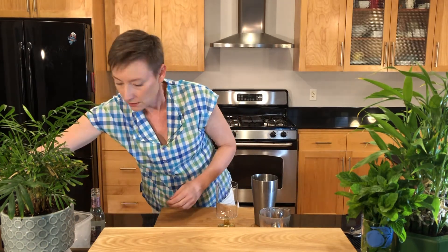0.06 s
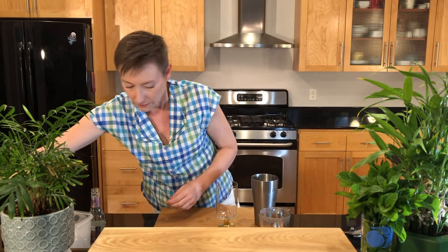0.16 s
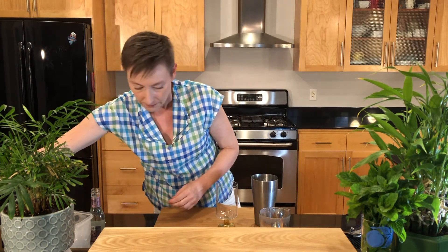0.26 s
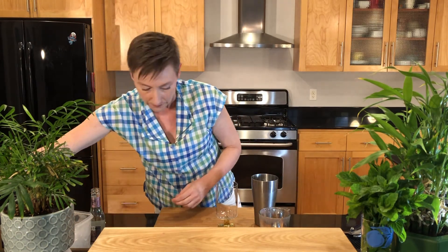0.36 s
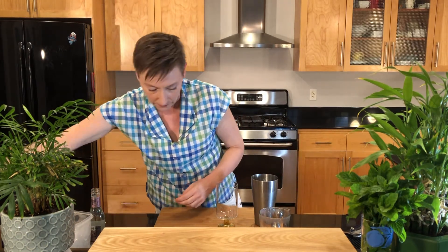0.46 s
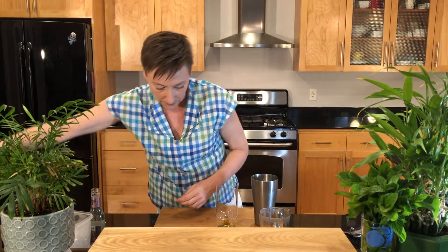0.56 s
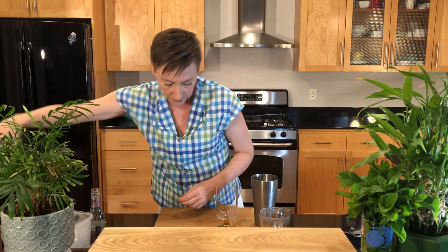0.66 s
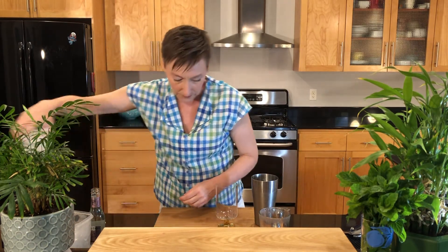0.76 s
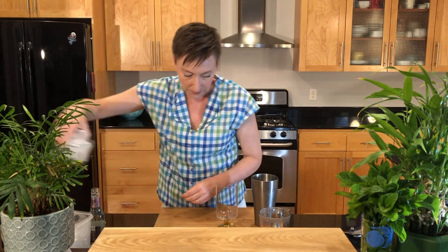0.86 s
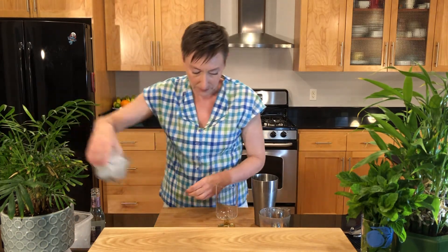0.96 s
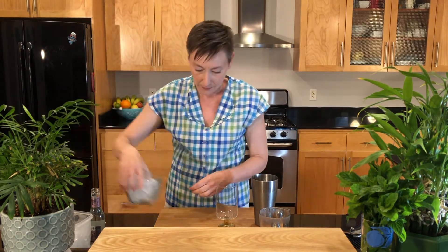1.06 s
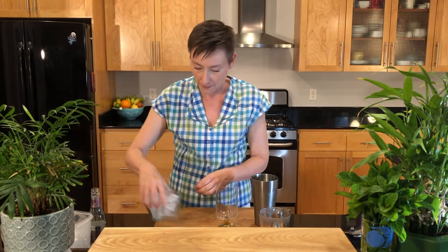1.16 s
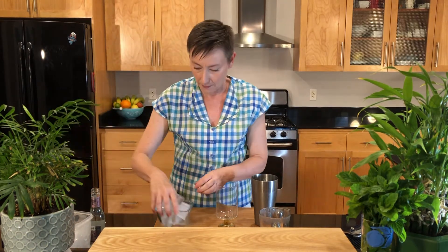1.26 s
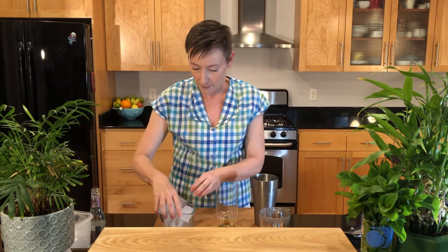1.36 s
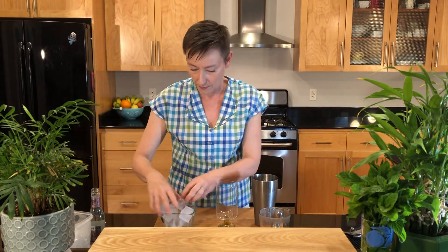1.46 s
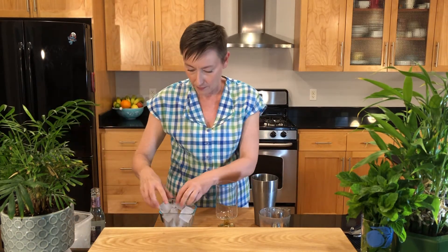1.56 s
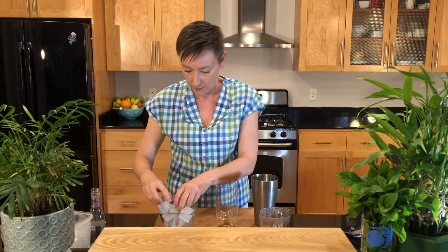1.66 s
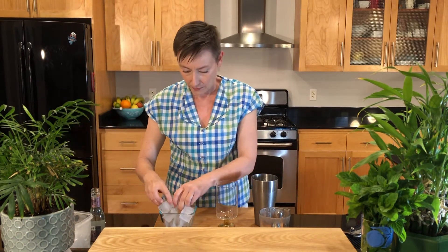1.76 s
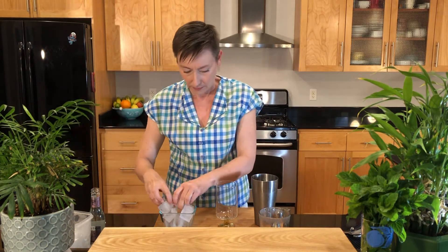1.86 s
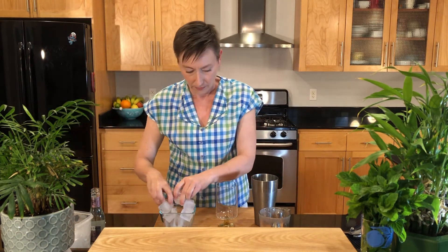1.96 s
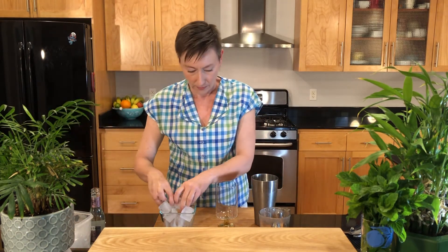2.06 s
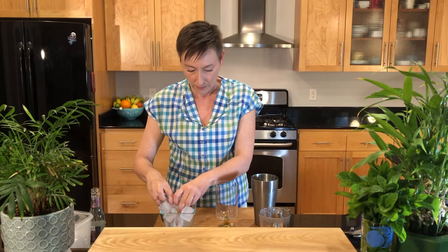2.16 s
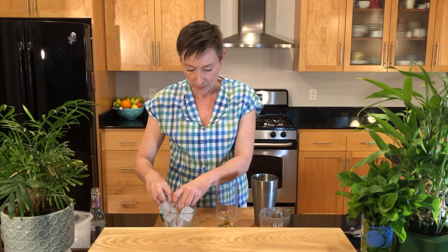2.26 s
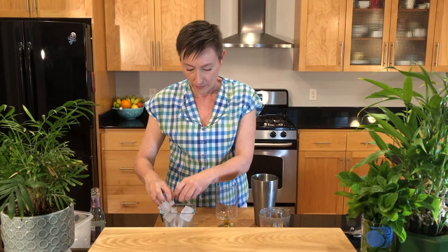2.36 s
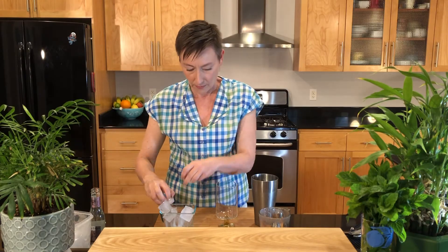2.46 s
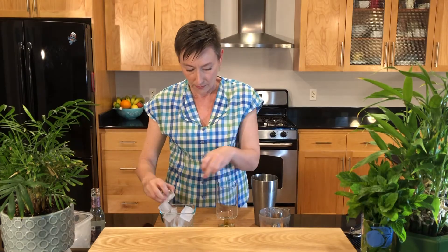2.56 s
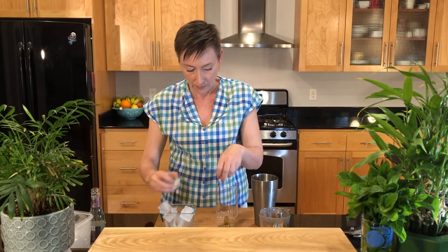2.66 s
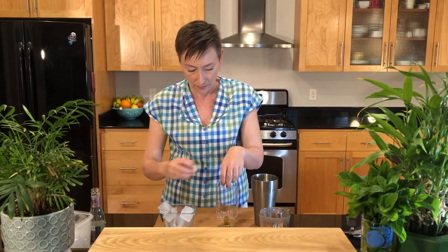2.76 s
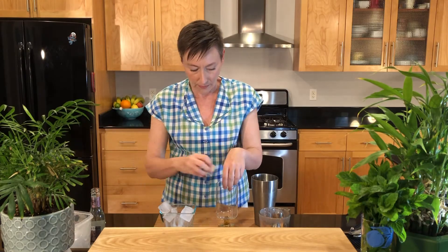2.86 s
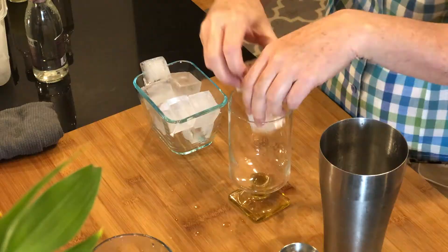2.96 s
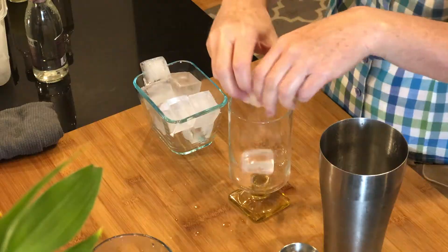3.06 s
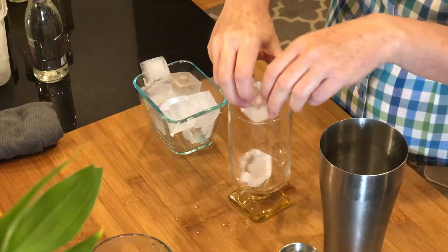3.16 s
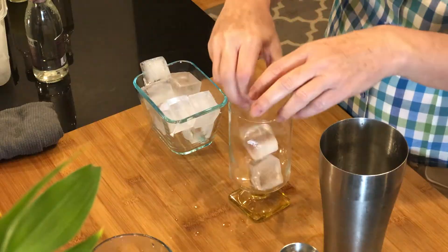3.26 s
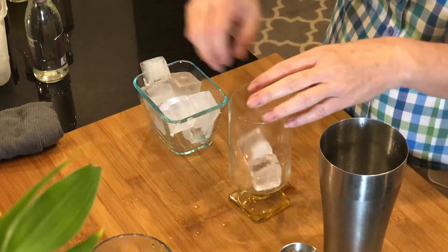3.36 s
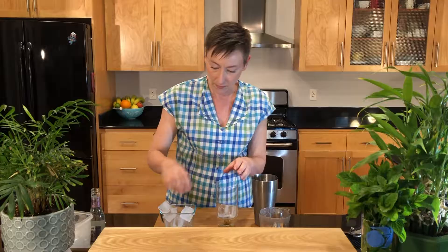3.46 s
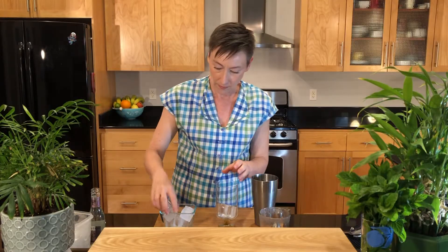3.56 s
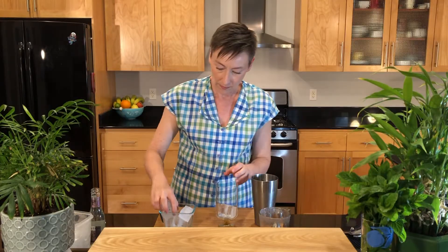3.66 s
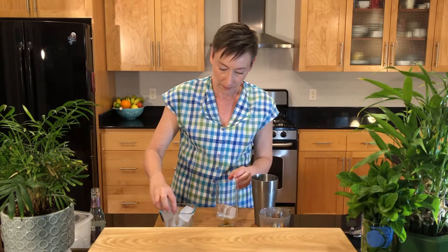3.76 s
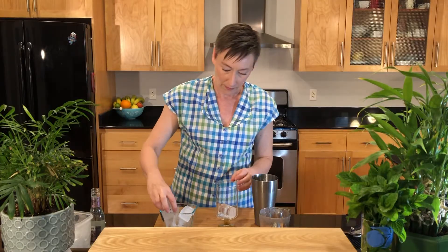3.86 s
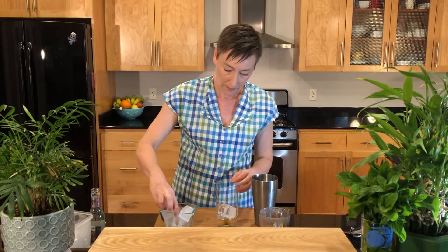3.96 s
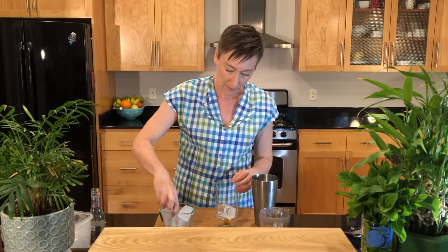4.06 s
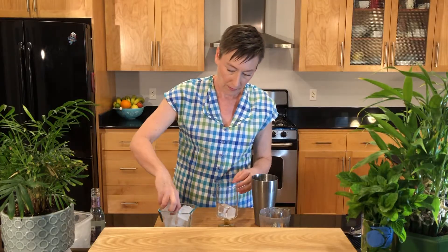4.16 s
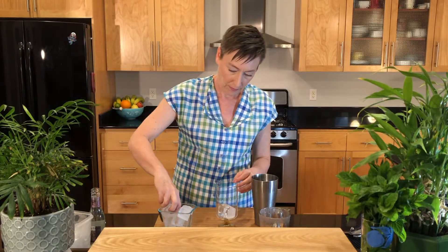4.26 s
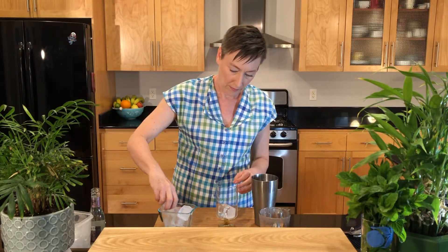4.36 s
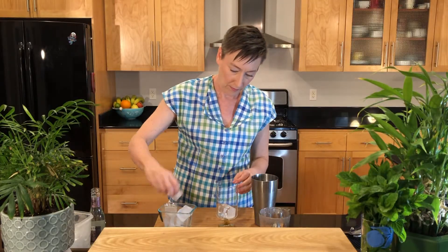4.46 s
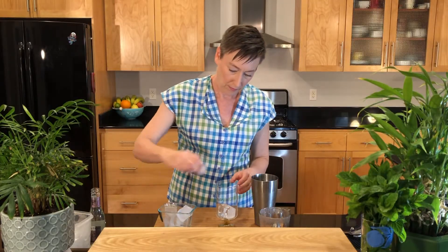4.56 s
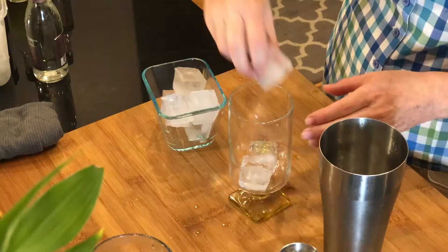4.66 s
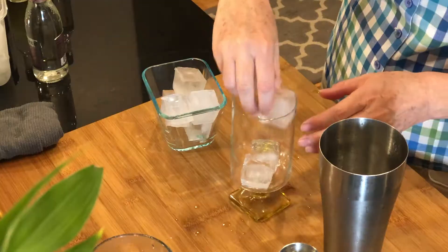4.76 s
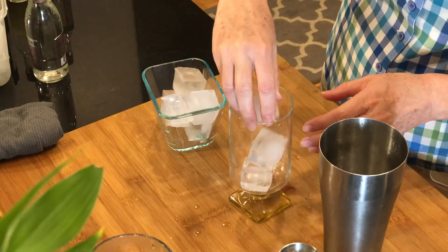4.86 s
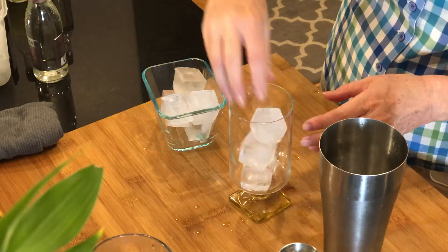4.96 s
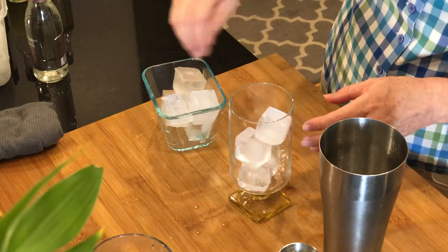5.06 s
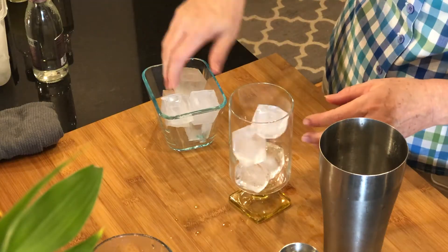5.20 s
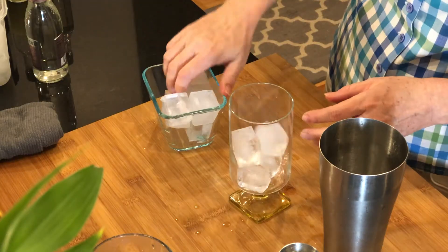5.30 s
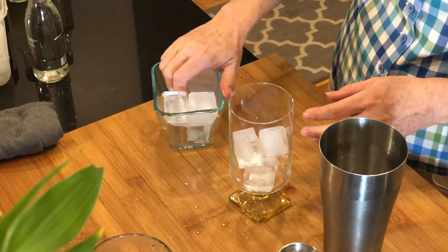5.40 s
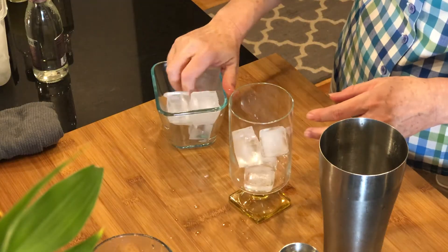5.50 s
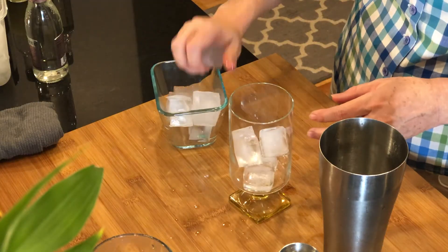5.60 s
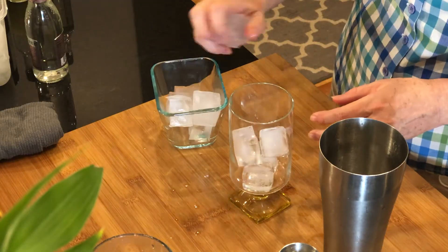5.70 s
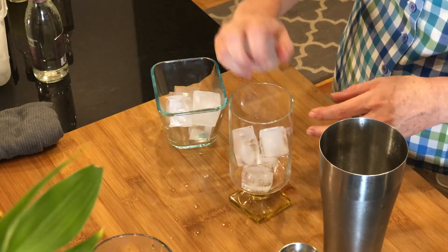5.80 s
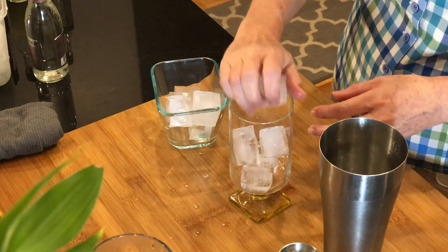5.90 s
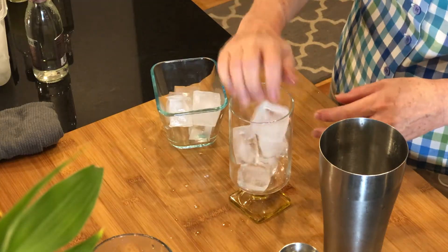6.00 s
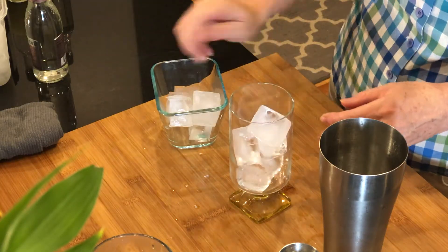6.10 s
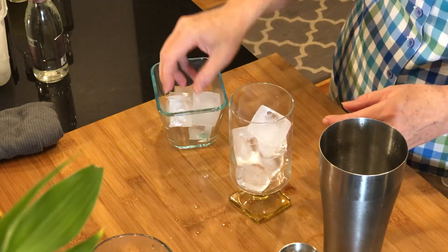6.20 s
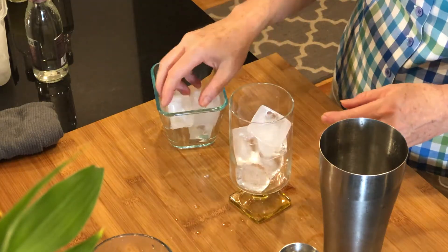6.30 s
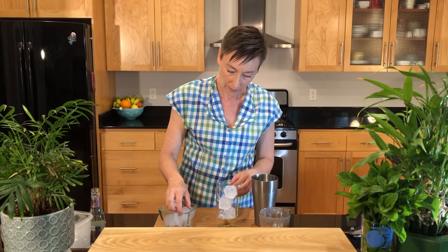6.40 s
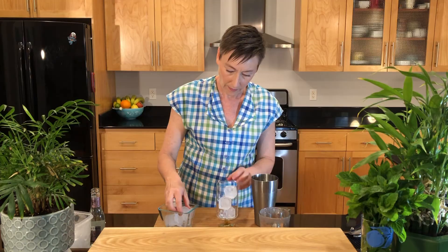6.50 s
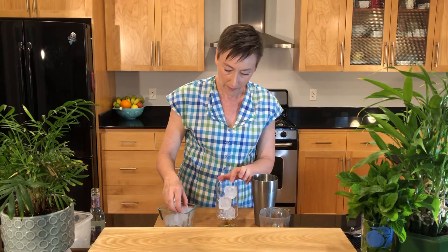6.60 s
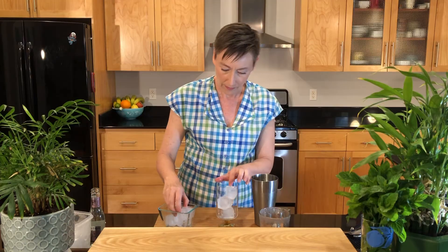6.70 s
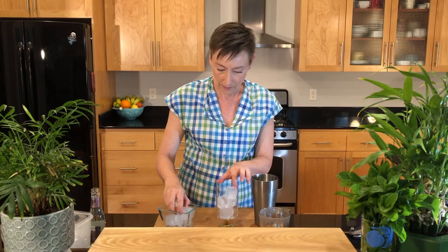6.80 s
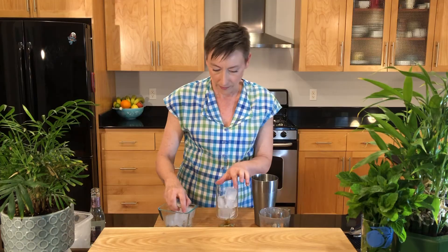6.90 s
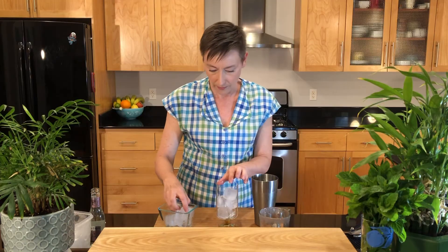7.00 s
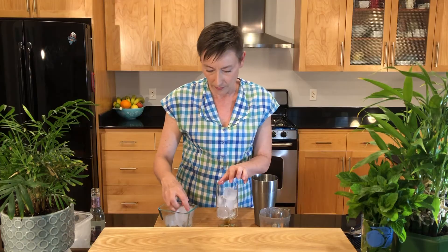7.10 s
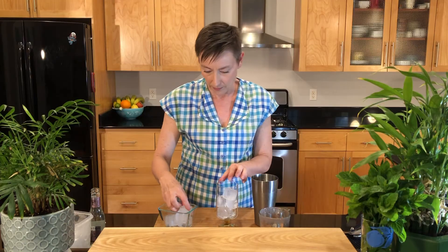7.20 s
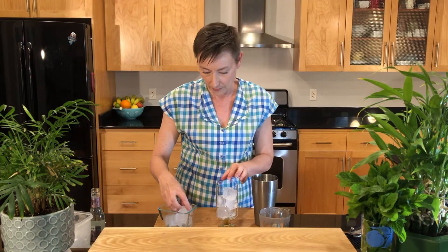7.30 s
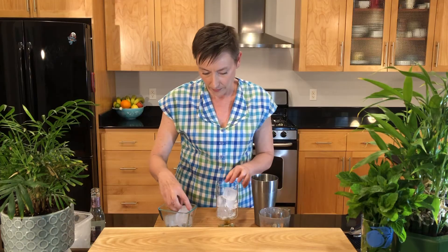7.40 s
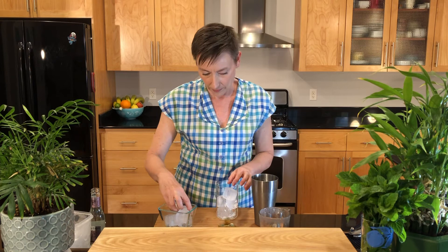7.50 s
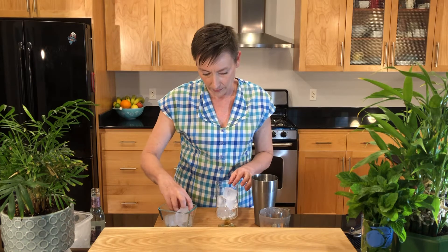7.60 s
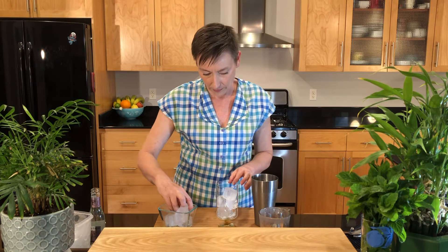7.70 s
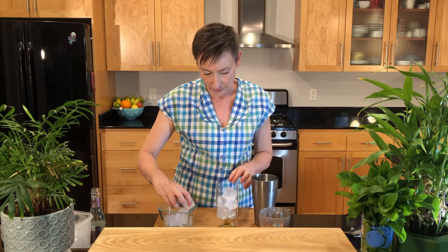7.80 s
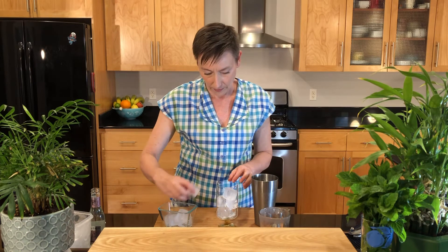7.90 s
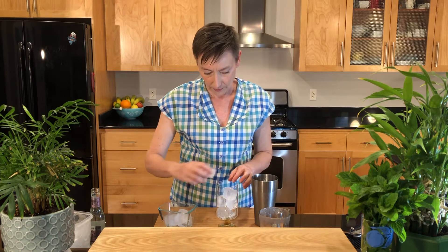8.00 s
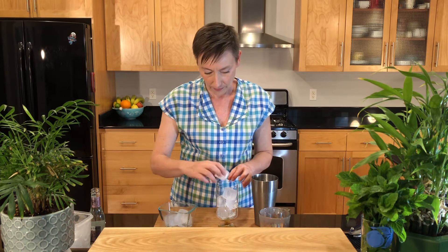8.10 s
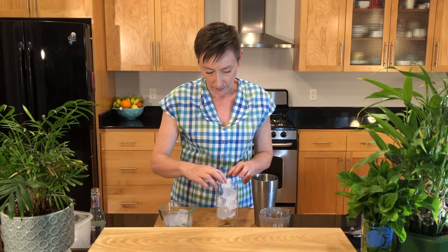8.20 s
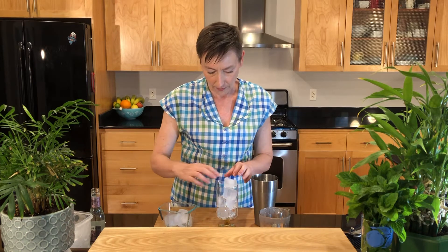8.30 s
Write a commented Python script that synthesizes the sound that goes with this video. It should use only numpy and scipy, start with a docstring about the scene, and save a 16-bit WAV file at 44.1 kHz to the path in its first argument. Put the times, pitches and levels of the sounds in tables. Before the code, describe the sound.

Fingers grope among wet ice cubes, making small ticks, scrapes and clacks against a glass bowl. Handfuls then tumble into a tall glass with short, bright, quickly damped clinks and low woody thuds. The bowl rings a little more as it empties. Close mono sound, quiet kitchen, short room tail, soft hum beneath.

```python
"""Ice cubes into a tall glass

Ice cubes are picked out of a square glass bowl and dropped into a tall footed glass on a wooden board.
Each contact is a short burst of force: it cracks dully through a resonance of the ice, rings paired
decaying modes of the vessel and knocks the resonant board. Wet cubes slide between the blows as noise
of uneven size, and faint ticks follow groping fingers. A hard-walled kitchen answers with short noise
tails; a fridge hums in narrow bands of noise over steady air."""
import sys
import numpy as np
from scipy import signal
from scipy.fft import rfft, irfft, next_fast_len
from scipy.io import wavfile

SR = 44100
rng = np.random.default_rng(int(sys.argv[2]) if len(sys.argv) > 2 else 0)


def store_pcm(level_fs):
    """Save levels as 16-bit WAV."""
    pcm = np.round(np.clip(level_fs, -1, 1) * 32767).astype(np.int16)
    wavfile.write(sys.argv[1], SR, np.atleast_2d(pcm).T)


N = 368146

# All levels of ice, vessels and board are set ahead of the tone curve.
# Wet cubes sliding and fingers groping, joined by straight lines: start_s, scrape_db (rms), board_db (rms)
SLIDES = [(0.0, -64.5, -70), (1.21, -85, -71), (1.58, -59.5, -67), (2.98, -100, -79), (3.23, -56, -42),
          (4.74, -75, -100), (4.91, -67, -55.5), (5.51, -55, -61), (5.74, -80, -85.5), (6.16, -59.5, -65.5),
          (6.56, -65, -67), (6.76, -67, -51.5), (6.97, -66, -61), (8.16, -81.5, -88.5), (8.35, -70, -65.5)]
# Spectrum of the scrape: hz, relative_db
SCRAPE_SPECTRUM = [(710, -29.5), (1200, 3), (4450, -9), (8660, -16.5), (15000, -40.5)]
# Resonances of the board under the vessels: hz, width_hz, level_db
BOARD_MODES = [(134, 55, -2.5), (244.5, 19, 1.5), (416, 68, 2), (644, 130, 6.5), (968, 383, 5),
               (1820, 120, -16)]
# Spectrum of kitchen air and hiss: hz, relative_db
AIR_SPECTRUM = [(25, -41), (96, -8), (290, -8.5), (500, -15), (1150, -33), (6300, -36), (14600, -40),
                (15800, -57.5)]
# Fridge hum: hz, level_db (rms)
FRIDGE_HUM = [(107.7, -80.5), (236.9, -72.5), (290.7, -82.5), (468.3, -75.5)]
# Cubes striking each other and the bowl:
# start_s, crack_peak_db, crack_centre_hz, bowl_ring_db, knock_peak_db
BOWL_BLOWS = [(0.0171, -35, 2210, -43, -44), (0.0321, -40, 4570, -57, -46), (0.196, -39.5, 4470, -65, -59),
              (0.2204, -42.5, 1600, -63, -47), (0.4504, -29, 4500, -41, -50),
              (1.0831, -47, 2230, -56, -42.5), (1.3159, -18.5, 1920, -21, -24),
              (1.339, -18, 1650, -47, -19.5), (1.3798, -29, 1680, -54, -20), (1.5786, -38, 2334, -55, -50),
              (1.595, -35, 4200, -47, -59), (1.6232, -39.5, 2340, -66, -51),
              (1.6487, -32.5, 6070, -43, -63), (1.707, -34, 2340, -46, -39), (1.7244, -42, 2340, -59, -53),
              (1.731, -36, 2090, -48, -54), (1.8911, -36, 2150, -49, -62.5), (1.963, -34, 2230, -28, -31),
              (1.9739, -23.5, 1600, -48, -40), (2.0153, -31, 5180, -31.5, -46),
              (2.0296, -7.5, 3150, -43, -37.5), (2.0342, -12, 3530, -15, -37),
              (2.0475, -12, 3600, -43, -27.5), (3.5504, -26, 1610, -38, -35),
              (3.5598, -25.5, 2860, -39, -29.5), (3.6137, -33, 1640, -50, -43),
              (3.6896, -26.5, 4200, -39, -42), (3.7322, -30.5, 1570, -50, -39.5),
              (3.7898, -23.5, 1683, -36, -21.5), (3.7995, -20.5, 2270, -38, -44),
              (3.8028, -23.5, 3960, -49, -31.5), (3.8427, -25.5, 4140, -44, -33),
              (3.8581, -32, 2150, -50, -36), (3.9245, -34.5, 2570, -44.5, -42),
              (3.9426, -35.5, 2600, -35, -46), (3.9679, -28, 1670, -43, -43),
              (3.986, -16.5, 3900, -33, -34.5), (4.0881, -38, 1530, -35, -42.5),
              (4.0969, -24, 3350, -50, -33), (4.2912, -40, 1570, -48, -49), (4.37, -55, 1880, -41.5, -41),
              (4.4066, -22, 1820, -30, -60), (4.4178, -19, 1528, -37, -61),
              (5.4944, -46, 4260, -36.5, -40.5), (5.5638, -26.5, 4700, -37, -37),
              (5.5843, -28.5, 3110, -38, -62), (5.6137, -28, 1730, -64, -44.5),
              (6.2301, -45, 4320, -39.5, -39), (6.2456, -29, 1635, -45, -32.5),
              (6.316, -23, 2240, -39, -39), (6.324, -25, 4320, -23, -35), (6.3484, -27, 1820, -36, -32.5),
              (6.4123, -41, 4180, -32, -42), (6.5885, -40, 2170, -46, -76),
              (6.6474, -37, 2210, -44.5, -37.5), (6.6848, -32.5, 1830, -44, -43),
              (6.7198, -31, 4670, -44, -36), (6.7956, -37, 5110, -47, -46), (6.8157, -35, 1710, -54, -49),
              (6.8808, -42, 4200, -57, -40), (7.004, -24, 4250, -41.5, -55),
              (7.1095, -24.5, 3180, -19.5, -57.5), (7.1162, -31, 3360, -21, -66),
              (7.2102, -25, 3200, -31.5, -35), (7.3332, -26.5, 2520, -37, -33.5),
              (7.3793, -45, 1620, -53, -29), (7.648, -52, 4400, -57.5, -79),
              (7.7298, -16, 3480, -33.5, -71), (7.7374, -47, 4160, -33.5, -41),
              (7.7764, -35, 6770, -20, -30), (7.7941, -19, 2890, -25.5, -28),
              (7.8275, -21, 1730, -37, -33.5)]
# Ringing modes of the bowl, before scatter and damping: hz, level_db, t60_s
BOWL_MODES = [(1566, -11.5, .1), (1791, -1, 0.043), (2156, -11.5, .1), (3118, -4.5, 0.11),
              (3300, -16, 0.11), (3616, 0.5, 0.022), (3542, -17.5, 0.052), (4395, -10, 0.59),
              (4700, -24.5, 0.33), (5040, -22, 0.097), (5370, -46, .12), (6160, -25.5, 0.061),
              (6090, -13, .12), (7197, -10, 0.33), (7600, -27.5, 0.1), (8490, -13.5, 0.055),
              (8400, -36, .1), (9690, -42.5, .08), (11000, -36, .08), (11550, -48, .1)]
# Spectrum of the broad part of a crack: hz, relative_db
CRACK_SPECTRUM = [(300, -29.5), (1500, -4.5), (5000, -7.5), (9000, -17.5), (16000, -37.5)]
# A cube skidding along a wall, or the bowl settling on the board:
# start_s, length_s, crack_db, centre_hz, knock_db, ring_db, in_glass (1 in the glass, 0 in the bowl)
SKID_CONTACTS = [(0.181, 0.093, -39.5, 1200, -36, -84, 0), (1.3, 0.052, -19, 4200, -11, -56, 0),
                 (3.044, 0.081, -24.5, 5240, -27, -41, 1), (3.257, 0.098, -21.5, 2870, -53, -20, 1),
                 (4.714, 0.27, -34, 5200, -57.5, -33.5, 1), (5.209, 0.053, -30.5, 2860, -29.5, -35, 1),
                 (5.549, 0.12, -26.5, 3300, -31.5, -47, 0), (5.894, 0.041, -76, 2430, -43, -36.5, 1),
                 (6.869, 0.045, -23, 4360, -38, -70, 0), (7.099, 0.095, -17.5, 5820, -34, -25.5, 0),
                 (8.137, 0.063, -23.5, 4840, -34.5, -34, 1)]
# Spells of fingers groping among the cubes: start_s, end_s, tick_peak_db (typical)
GROPING_SPELLS = [(.23, .32, -53), (1.05, 1.15, -56), (1.53, 1.95, -50), (3.6, 4.12, -47), (4.25, 4.4, -50),
                  (5.45, 5.65, -46), (6.45, 6.87, -51), (7.4, 7.7, -57)]
# Cubes striking the tall glass:
# start_s, crack_peak_db, crack_centre_hz, low_ring_db, wall_ring_db, favoured_mode_hz
GLASS_BLOWS = [(2.9721, -68, 2310, -46.5, -38, 4910), (3.0634, -31.5, 2660, -28.5, -50, 5290),
               (3.0754, -17.5, 1750, -34, -44, 5300), (3.1158, -15.5, 1860, -36.5, -39, 5750),
               (3.1264, -28, 1940, -25, -52.5, 4740), (3.1672, -28, 1980, -31, -42.5, 5150),
               (3.2081, -23, 3160, -45.5, -44, 5400), (3.2779, -18.5, 2630, -23.5, -25.5, 5870),
               (3.3213, -23, 1810, -28.5, -49, 5150), (3.3478, -32, 2450, -27.5, -25.5, 4780),
               (3.3886, -14.5, 1770, -18.5, -50, 5400), (3.4004, -20, 2070, -38.5, -44, 5180),
               (3.4184, -29.5, 1690, -39, -26.5, 5880), (3.4334, -21, 1950, -60.5, -69, 5640),
               (4.7334, -65, 2660, -64.5, -27.5, 4890), (4.7816, -22.5, 3120, -29.5, -26.5, 4270),
               (4.8214, -36, 3080, -23, -79.5, 4930), (4.8597, -25.5, 3000, -22, -45, 5890),
               (4.8792, -17.5, 2120, -34.5, -30, 5980), (4.8908, -18, 2650, -30.5, -30.5, 6100),
               (4.9129, -13, 2000, -44, -27.5, 4600), (4.9272, -53, 1920, -28, -35.5, 5060),
               (4.9484, -44.5, 2290, -29.5, -46, 4900), (5.0075, -26.5, 2060, -54.5, -40, 4270),
               (5.034, -23.5, 3100, -33.5, -31, 4460), (5.0782, -38, 2940, -58, -30.5, 4000),
               (5.2345, -27, 1860, -48, -43, 4910), (5.2563, -17.5, 2000, -39.5, -24.5, 5060),
               (5.2664, -29, 1950, -35.5, -33, 4900), (5.2954, -35.5, 1860, -41, -34, 4300),
               (5.3134, -12, 3200, -24.5, -28.5, 4260), (5.3364, -18.5, 2270, -37.5, -26, 5010),
               (5.3494, -26.5, 3310, -42.5, -27, 5130), (5.3634, -40, 1930, -59, -19, 4920),
               (5.3984, -38.5, 2270, -45.5, -46.5, 4920), (5.519, -31, 2300, -47, -41.5, 5870),
               (5.9056, -43, 2330, -49, -42.5, 5530), (5.9636, -29.5, 2340, -39, -39.5, 4800),
               (5.9763, -17, 3000, -41.5, -23, 4740), (5.9993, -18, 1910, -27, -36, 5030),
               (6.0151, -16, 2880, -40.5, -21, 4950), (8.1574, -39.5, 2960, -47, -19, 4550),
               (8.1628, -18.5, 3050, -59, -27, 4540), (8.1833, -25, 3060, -39, -37, 4460),
               (8.2013, -21, 1780, -36, -61, 4700), (8.2676, -30, 2100, -39, -27, 4400)]
# Ringing modes of the tall glass, before scatter and damping: hz, level_db, t60_s
GLASS_MODES = [(466, -22.5, 0.54), (722.4, -7, 0.11), (885.7, -8, 0.17), (1824, -20, 0.17),
               (2348, -16.5, 0.2), (2875, -28, 0.028), (2980, -20.5, 0.07), (3310, -10, 0.011),
               (4285, -8, 0.19), (4943, -4.5, 0.1), (5160, -19, 0.074), (5875, -10.5, 0.31),
               (6763, -6.5, 0.046), (8160, -15, 0.1524), (8150, -26.5, .06), (9180, -11.5, 0.032),
               (9950, -18, 0.19), (10900, -16.5, 0.044), (11460, -36, 0.085), (13360, -27.5, .08),
               (14100, -49.5, 0.067), (14900, -35, .07)]
# Decay of the kitchen's answer: hz, t60_s
KITCHEN_DECAY = [(200, 0.44), (1000, 0.51), (4000, 0.33), (12000, 0.3)]
# Tone curve of the ice and the room's answer to it: hz, level_db
TONE_CURVE = [(40, -22.5), (200, -3), (7000, -4), (11500, -8.5), (12500, -13), (16000, -9)]

TOP_HZ = 15600  # nothing is heard above this
# Ice cracks in a short contact and presses longer on a wall; natural-log scatter of both
CONTACT_S, PRESS_S, CONTACT_SCATTER = 0.0015, 0.0036, 0.46
# Lift of the bowl's modes near the pitch of the crack, and width of that lift
BOWL_LIFT_DB, BOWL_LIFT_OCTAVES = 8, .25
TICKS_PER_S, TICK_SCATTER_DB, TICK_KNOCK_DB = 24, 3, -6  # knock relative to the tick's crack
TICK_HZ, TICK_OCTAVES = 2800, .5  # middle pitch and its scatter
HIGH_RING_DB, CRUNCH_DB = 4.5, -4  # top modes and crunch, over the wall ring
UPPER_RING_DB, THUD_DB = -5, 4.5  # 2 kHz modes over the crack; board over the low ring
RIM_DB_PER_OCTAVE = 19  # blows favouring a higher mode also wake the top modes more
FOOT_HZ, FOOT_DB = 756, -10  # thud of the thick foot, over the low ring
SQUARE_ON = 0.14  # missing the wall for the foot hardens its thud (dB per dB of low over wall ring)
FILL_DB_PER_S = 2  # as ice piles up, the low ring moves from the upper to the lower of its two modes


def amp(db):
    """Gain of a level in dB."""
    return 10 ** (np.asarray(db) / 20)


def unit(x):
    """x brought to rms 1."""
    return x / np.sqrt(np.mean(x ** 2) + 1e-20)


def peaking(x, db):
    """x with its highest swing at a level in dB."""
    return amp(db) * x / np.abs(x).max()


def along(points, hz):
    """(Hz, value) points read on a log frequency axis."""
    f, v = np.transpose(points)
    return np.interp(np.log(hz + 1), np.log(f + 1), v)


def filtered(x, response):
    """x shaped by a complex response of frequency."""
    m = next_fast_len(len(x) + 4096)
    return irfft(rfft(x, m) * response(np.fft.rfftfreq(m, 1 / SR)), m)[:len(x)]


def resonance(f, hz, width_hz):
    """A causal resonant peak of height 1."""
    return 1j * f * width_hz / (hz * hz - f * f + 1j * f * width_hz)


def add(track, s, sound):
    """Mixes a sound into a track at a moment."""
    track[round(s * SR):][:len(sound)] += sound


def board(f):
    """The wooden board's short, low resonances; it takes up little treble."""
    modes = sum((-1) ** k * amp(db) * resonance(f, hz, width_hz)
                for k, (hz, width_hz, db) in enumerate(BOARD_MODES))
    return resonance(f, 330, 2000) * modes


def sliding():
    """Groping among the cubes is a thick train of tiny slips of uneven size: noise with a jumping level."""
    s, scrape_db, board_db = np.transpose(SLIDES)
    now = np.arange(N) / SR
    size_db = 4 * rng.standard_normal(N // 150 + 1).repeat(150)[:N]
    slips = rng.standard_normal((2, N)) * amp(size_db)
    scrape = unit(filtered(slips[0], lambda f: amp(along(SCRAPE_SPECTRUM, f))))
    rumble = unit(filtered(slips[1], board))
    return amp(np.interp(now, s, scrape_db)) * scrape + amp(np.interp(now, s, board_db)) * rumble


def background():
    """Steady air noise, and a fridge hum that wavers because each tone is a narrow band of noise."""
    air = amp(-64.5) * unit(filtered(rng.standard_normal(N), lambda f: amp(along(AIR_SPECTRUM, f))))
    hum = [amp(db) * unit(filtered(rng.standard_normal(N), lambda f: resonance(f, hz, 1.2)))
           for hz, db in FRIDGE_HUM]
    return air + sum(hum)


AFTER = np.arange(SR // 2) / SR  # time since a contact (s)


def contact(length_s, first_db=10):
    """The force of one contact: a first sharp blow, then rough pressure dying within a few lengths."""
    t = AFTER[:SR // 4] / np.clip(length_s, 3e-4, .1)
    force = (1 - np.exp(-3 * t)) * np.exp(-t) * rng.standard_normal(len(t))
    force[0] = amp(first_db)
    return force


def blow(length_s):
    """A short contact whose length scatters by chance."""
    return contact(length_s * np.exp(CONTACT_SCATTER * rng.standard_normal()))


def crack(force, db, hz):
    """Ice is dull: one short resonance of the cube; the rough part of the contact adds a wide click."""
    cube = filtered(force, lambda f: resonance(f, hz, 0.42 * hz) ** 2)
    click = filtered(force[1:], lambda f: amp(along(CRACK_SPECTRUM, f)) * resonance(f, hz, 4 * hz))
    cube[1:] += click
    return amp(db) * cube


def snap(force, db, hz):
    """A short crack with a given peak level."""
    return peaking(crack(force[:SR // 20], 0, hz), db)


def favour(f, hz, lift_db, octaves):
    """The place of a blow lifts the modes near one pitch."""
    return lift_db * np.exp(-(np.log2(f / hz) / octaves) ** 2)


def ringer(modes, scatter_db, split):
    """A vessel's ring under a force; no vessel is quite even, so each mode is a close pair that beats."""
    hz, level, t60 = np.tile(np.transpose(modes), 2)
    hz = hz * (1 + split * np.repeat([-1, 1], len(modes)))
    decay = amp(-60 * AFTER / np.clip(t60, .02, .5)[:, None])
    shapes = decay * np.sin(2 * np.pi * hz[:, None] * AFTER)
    # the wall takes a moment to swing up
    shapes = shapes * (1 - np.exp(-AFTER / 0.0017))
    # the wet cube clings to the wall and soon takes most of the swing
    shapes = shapes * (.25 + np.exp(-AFTER / .016))

    def ring(db_of, force, damping_db):
        """Rings the modes; damping_db is the extra loss each second by ice that leans on the wall."""
        strengths = amp(level + db_of(hz) + scatter_db * rng.standard_normal(len(hz)))
        response = strengths @ shapes * amp(-damping_db * AFTER)
        return signal.fftconvolve(response, force / np.linalg.norm(force))
    return ring


def bowl_damping(s):
    """The bowl empties and rings longer (dB a second)."""
    return 190 * max(7.8 - s, 0)


def bowl(ring):
    """Cubes crack on each other; the bowl rings most near the crack's pitch, and the board is knocked."""
    out = np.zeros(N + SR)
    for s, db, hz, ring_db, knock_db in BOWL_BLOWS:
        hit, press = blow(CONTACT_S), blow(PRESS_S)

        def mode_db(f):
            return ring_db - BOWL_LIFT_DB + favour(f, hz, BOWL_LIFT_DB, BOWL_LIFT_OCTAVES)
        add(out, s, ring(mode_db, press, bowl_damping(s)))
        add(out, s, snap(hit, db, hz))
        add(out, s, peaking(filtered(press, board), knock_db))
    return out[:N]


def skids(glass_ring, bowl_ring):
    """A skid is a long, rough contact: a smear of cracking that keeps the vessel singing."""
    out = np.zeros(N + SR)
    for s, length_s, db, hz, knock_db, ring_db, in_glass in SKID_CONTACTS:
        force = contact(length_s / 2, first_db=-35.5)
        ring, damping = (glass_ring, glass_damping) if in_glass else (bowl_ring, bowl_damping)
        add(out, s, crack(force, db, hz) + amp(knock_db) * filtered(force, board))
        add(out, s, ring(lambda f: ring_db, force, damping(s)))
    return out[:N]


def ticks():
    """Small ice-on-ice ticks of chance moment, pitch and size while the fingers grope."""
    out = np.zeros(N + SR)
    for start, end, db in GROPING_SPELLS:
        for _ in range(round(TICKS_PER_S * (end - start)) + 1):
            force = blow(CONTACT_S)
            size, pitch = rng.standard_normal(2)
            tick = peaking(crack(force, 0, TICK_HZ * 2 ** (TICK_OCTAVES * pitch)), 0)
            tick = tick + peaking(filtered(force, board), TICK_KNOCK_DB)
            add(out, rng.uniform(start, end), amp(db + TICK_SCATTER_DB * size) * tick)
    return out[:N]


def glass_damping(s):
    """The glass fills with ice as time goes on and rings ever shorter (dB a second)."""
    return 6 * max(s - 3, 0) ** 3


def glass(ring):
    """Where the cube lands sets how much the low modes and the wall of the glass ring."""
    out = np.zeros(N + SR)
    for s, db, hz, low_db, wall_db, favoured_hz in GLASS_BLOWS:
        hit, press = blow(CONTACT_S), blow(PRESS_S)
        high_db = wall_db + HIGH_RING_DB + RIM_DB_PER_OCTAVE * np.log2(favoured_hz / 5000)
        fill_db = FILL_DB_PER_S * (s - 4)
        tilt = [(700, low_db + fill_db), (900, low_db - fill_db), (2300, db + UPPER_RING_DB),
                (5500, wall_db), (9500, high_db)]

        def mode_db(f):
            return along(tilt, f) + favour(f, favoured_hz, lift_db=9, octaves=0.13)
        add(out, s, ring(mode_db, press, glass_damping(s)))
        ice = snap(hit, db, hz)
        foot = snap(hit, low_db + FOOT_DB + SQUARE_ON * (low_db - wall_db), FOOT_HZ)
        crunch = snap(press, wall_db + CRUNCH_DB, favoured_hz)
        add(out, s, ice + foot + crunch)
        add(out, s, peaking(filtered(hit, board), low_db + THUD_DB))
    return out[:N]


def kitchen(x):
    """The room's answer: noise tails, each frequency dying at its own speed, fresh every quarter second."""
    out, step = np.zeros(N + SR), SR // 4
    for start in range(0, N, step):
        hz, t, z = signal.stft(rng.standard_normal(SR // 2), SR, nperseg=256)
        decay = amp(-60 * t / along(KITCHEN_DECAY, hz)[:, None])
        tail = signal.istft(z * decay, SR, nperseg=256)[1]
        answer = signal.fftconvolve(x[start:start + step], tail / np.linalg.norm(tail))
        add(out, start / SR + 0.0036, answer)
    return out[:N]


def scene():
    """Ice, vessels and board with the room around them, over air and fridge."""
    glass_ring = ringer(GLASS_MODES, scatter_db=4, split=0.004)
    bowl_ring = ringer(BOWL_MODES, scatter_db=3, split=0.002)
    ice = glass(glass_ring) + bowl(bowl_ring) + skids(glass_ring, bowl_ring) + sliding() + ticks()
    in_room = ice + amp(-6.5) * kitchen(ice)
    heard = filtered(in_room, lambda f: amp(along(TONE_CURVE, f)))
    return (heard + background())[None]


def record(dry):
    """A steep band limit removes everything from TOP_HZ up."""
    return filtered(dry[0], lambda f: f < TOP_HZ)[None]


dry = scene()
out = record(dry)
store_pcm(out)
```